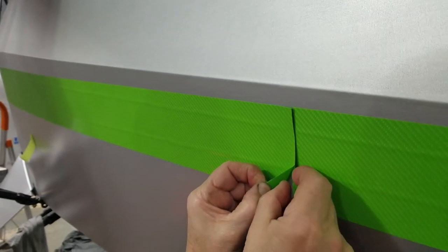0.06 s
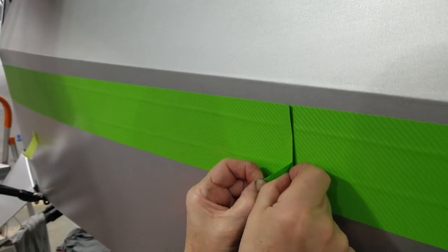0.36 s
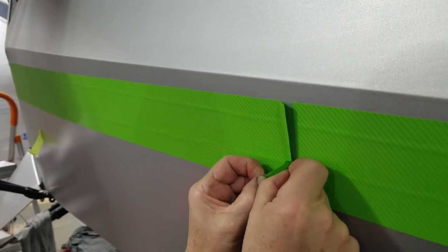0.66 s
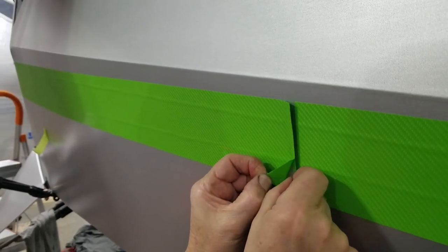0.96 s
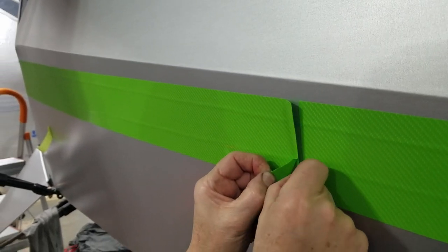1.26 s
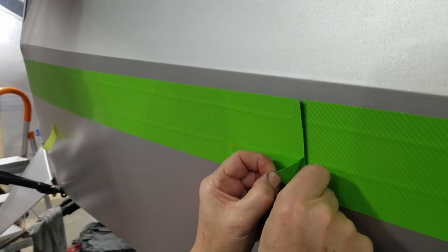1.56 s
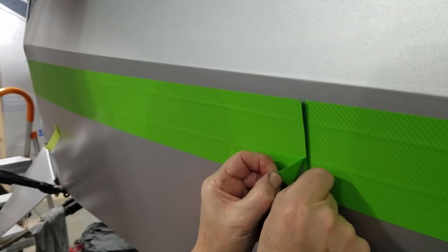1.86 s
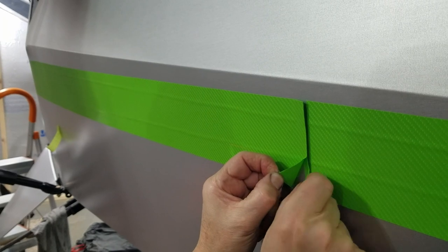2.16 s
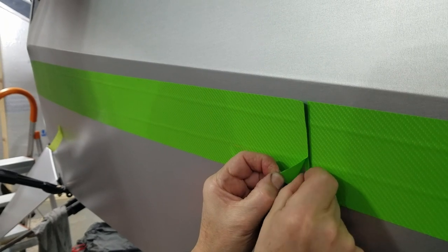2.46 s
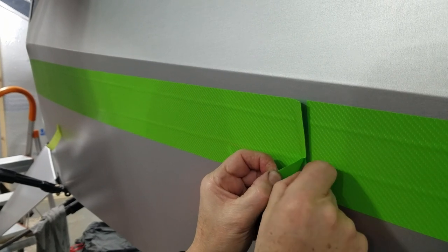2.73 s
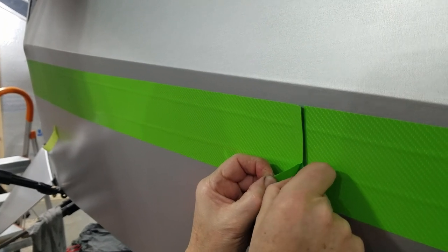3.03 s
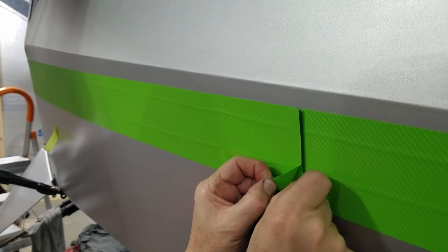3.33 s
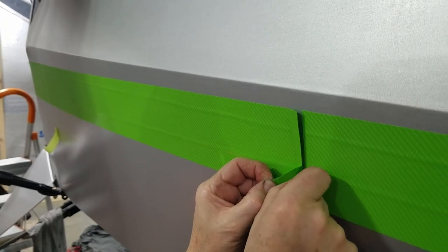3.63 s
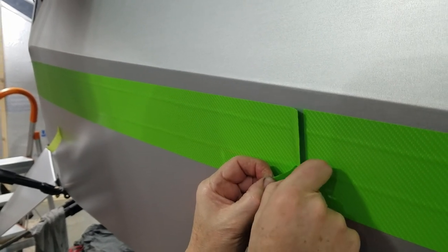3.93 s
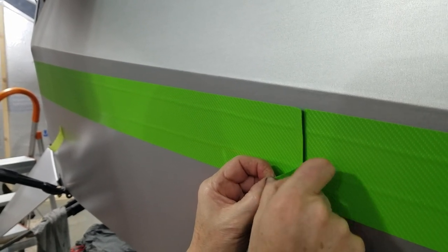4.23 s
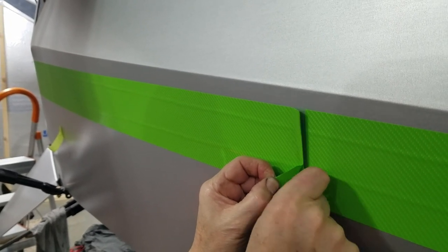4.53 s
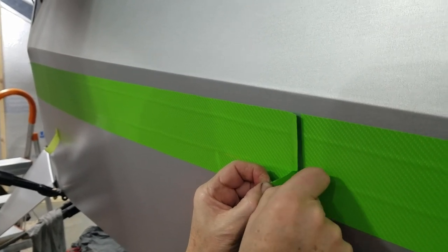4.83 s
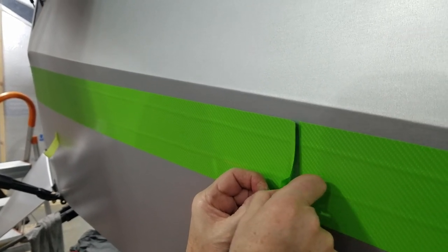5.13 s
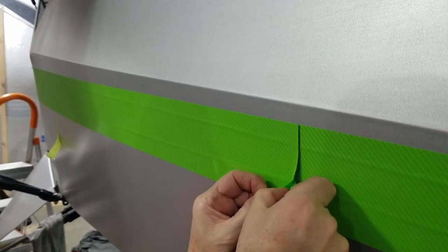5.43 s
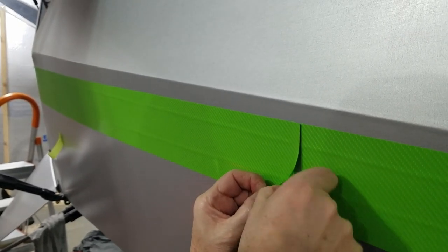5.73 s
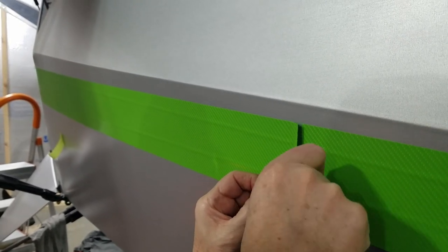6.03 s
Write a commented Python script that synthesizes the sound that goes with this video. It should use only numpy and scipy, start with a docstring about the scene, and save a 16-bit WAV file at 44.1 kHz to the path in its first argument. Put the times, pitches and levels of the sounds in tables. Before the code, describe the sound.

Fingers work a vinyl strip on taut fabric, making sharp ticks and two drum-like thumps over a faint workshop hum.

```python
"""A vinyl stripe snaps as fingers work its end on fabric stretched over a frame, in a quiet workshop.
Each snap is a tick of the stiff edge, a slap of the hand-damped fabric and a twang of the loose flap.
Four times the adhesive lets go and the whole panel booms like a drum skin.
Fingertips rub and a knuckle bumps the frame between snaps, over a steady fan-like hum."""
import sys
import numpy as np
from scipy import signal
from scipy.fft import rfft, irfft
from scipy.io import wavfile

SR = 44100
rng = np.random.default_rng(int(sys.argv[2]) if len(sys.argv) > 2 else 0)


def pcm_store(signal):
    """Save signal as 16-bit PCM."""
    levels = np.round(np.clip(np.atleast_2d(signal), -1, 1) * 32767)
    wavfile.write(sys.argv[1], SR, levels.astype(np.int16).T)


N = 272538

# vinyl snaps: (time [s], tick [dB], tick treble [dB], slap [dB], flap pitch [Hz], flap [dB])
SNAPS = [(0.5005, -20.5, 3, -38, 2220, -59), (0.531, -18.5, -3, -53, 1540, -40),
         (0.7923, -16.5, -7, -36, 570, -32), (1.4616, -23.5, -6, -43, 1260, -39),
         (1.5070, -17, -10.5, -33, 1330, -33.5), (1.5868, -25.5, 26, -54, 1260, -57),
         (1.5991, -25.5, -30, -28.5, 986, -32.5), (2.1215, -15.5, -8, -39.5, 1370, -37),
         (2.1572, -22.5, 5, -46, 616, -52), (2.8658, -16.5, 18, -18, 580, -30),
         (3.1735, -24.5, -8, -29.5, 1365, -36), (3.2360, -31, -14, -47, 2870, -42),
         (3.9396, -17, -7.5, -58, 1370, -32), (4.0154, -10, -2, -4.5, 1307, -9.5),
         (4.496, -23, -0.5, -33.5, 1660, -38.5), (5.0338, -38, -2, -36, 3040, -37),
         (5.0479, -10, -34, -20.5, 584, -27.5), (5.0999, -8, -11, -0.5, 942, -10),
         (5.2908, -22.5, -7, -38, 1540, -49)]
def snaps(tick_pan_db=-0.5, slap_pan_db=-3):
    """Each snap drives edge, fabric and flap; returns the ticks apart from the other two."""
    t = np.arange(SR // 8) / SR
    ticks, slaps = np.zeros((2, 2, N))
    fabric = slap(t)
    for time_s, tick_db, treble_db, slap_db, flap_hz, flap_db in SNAPS:
        add(ticks, time_s, amp(tick_db) * tick(t, slap_db, treble_db) * pan(tick_pan_db))
        body = amp(slap_db) * fabric + amp(flap_db) * flap(t, flap_hz)
        add(slaps, time_s, body * pan(slap_pan_db))
    return ticks, slaps


# vinyl edge spectrum: (frequency [Hz], relative level [dB])
TICK_SPECTRUM = [(300, 11.5), (1500, -4.5), (2600, 2.5), (4500, 0), (6500, -5), (9000, -0.5), (11500, 3),
                 (13500, 5.5), (16500, -1.5)]
def tick(t, slap_db, treble_db, crackle_gain=0.79, crackle_s=0.0011):
    """The vinyl edge flicks: one bright click and a millisecond of crackle."""
    click = stereo_noise(len(t), 0) * crackle_gain * np.exp(-t / crackle_s)
    click[0, 2] = click[1, 0] = 1
    click /= np.sqrt(np.sum(click ** 2) / 2)
    # a big release takes longer, which rounds off the click
    rolloff = [(11000, 0), (15000, np.interp(slap_db, [-35, -10], [0, -9]))]
    shelf = [(3500, 0), (12000, treble_db)]
    return colour(click, [(hz, db + lookup(rolloff, hz) + lookup(shelf, hz)) for hz, db in TICK_SPECTRUM])


# modes of the fabric under the fingers: (frequency [Hz], relative level [dB], t60 [s])
PATCH_MODES = [(240, -16, .03), (610, -13, .02), (885, -13, .035), (1080, -18, .03), (1250, -20, .03),
               (1540, -20, .025), (1890, -23, .02), (2200, -26, .014)]
def slap(t, pulse_s=0.00036, pulse_rise_s=0.00028, pulse_gain=6, patch_rise_s=0.00056):
    """The released fabric jumps: a rounded pressure pulse, then the patch rings."""
    pulse = pulse_gain * (1 - t / pulse_s / 3) * np.exp(-t / pulse_s) * rise(t, pulse_rise_s) ** 3
    patch = ring(PATCH_MODES, t, lead_s=0.0002) * rise(t, patch_rise_s) ** 2
    return -(pulse + patch * pan(0.6))


def flap(t, hz, overtone_ratio=1.52, overtone_db=-9, t60_s=0.014, rise_s=0.00045):
    """The loose vinyl end twangs; its free length sets the pitch."""
    modes = [(hz, 0, t60_s), (hz * overtone_ratio, overtone_db, t60_s)]
    return -ring(modes, t, lead_s=0.000095) * rise(t, rise_s) ** 2 * pan(1)


# adhesive releases: (time [s], boom [dB], tear [dB], tear build [s], tear fade [s], tear treble [dB])
RELEASES = [(0.7919, -47.5, -34.5, 0.00019, 0.00097, 9), (2.8653, -36.5, -49, .004, .005, 28),
            (4.0153, -24.5, -29, 0.00039, 0.003, -1), (5.0998, -21.5, -33, 0.00037, 0.02, -0.5)]
# tearing adhesive spectrum: (frequency [Hz], relative level [dB])
PEEL_SPECTRUM = [(300, -5.5), (950, -2), (1500, 6.5), (2400, 0), (4500, -5.5), (6000, -10.5), (9000, -22.5)]
def peel():
    """Adhesive threads break in a crackle that builds to each release and quickly fades."""
    t = np.arange(-SR // 50, SR // 8) / SR
    out = np.zeros((2, N))
    for time_s, _, tear_db, build_s, fade_s, treble_db in RELEASES:
        threads = unit(grains(len(t), correlation=0.2, spread_db=5))
        envelope = np.exp(-abs(t) / np.where(t < 0, build_s, fade_s))
        shelf = [(1500, 0), (8000, treble_db)]
        spectrum = [(hz, db + lookup(shelf, hz)) for hz, db in PEEL_SPECTRUM]
        add(out, time_s + t[0], amp(tear_db) * colour(threads * envelope, spectrum))
    return out * pan(-2)


def booms(panel, early_db=4, settle_s=0.042):
    """Each release rings the whole panel; the first wide swings lose energy fastest."""
    t = np.arange(panel.shape[1]) / SR
    out = np.zeros((2, N))
    swing = panel * amp(early_db * np.exp(-t / settle_s))
    for time_s, boom_db, *_ in RELEASES:
        add(out, time_s, amp(boom_db) * swing)
    return out


# strong panel modes: (frequency [Hz], level before step_gain [dB], t60 [s])
PANEL_MODES = [(45, -19, 1.91), (68, -23, 1.51), (92, -16, 1.86), (106, -19, 1.8), (117, -18, 1.57),
               (142, -12, 1.64), (155, -17, 1.17), (173, -3, 1.01), (188, -16, 1.07), (201, -14, 1.09),
               (221, -1, 0.34), (241, -17, 1.32), (252, -11, 1.32), (264, -17, 1.07), (280, -8, 0.7),
               (301, -5, 0.64), (316, -18, 1.1), (329, -19, 1.03), (342, -22, 1.21), (358, -20, 1.05),
               (393, -20, 0.6), (425, -18, 0.79), (454, -20, 0.8), (470, -14, 0.54), (531, -17, 0.43),
               (556, -24, 0.5), (594, -23, 0.52), (622, -23, 0.45)]
# spectrum of the dense weak modes: (frequency [Hz], relative level [dB])
DENSE_SPECTRUM = [(25, -24.5), (50, -14), (100, -12), (180, -13), (320, -21), (450, -17.5), (750, -23.5),
                  (1500, -65)]
# their decay: (frequency [Hz], t60 [s])
DENSE_T60 = [(50, 1.5), (120, 3.86), (250, 4.1), (450, 1.2), (900, 1.5)]
def panel_response(t, dense_db=-17, rise_s=0.02, bloom_s=0.008):
    """Neighbouring modes swing in opposite senses; weaker ones fill in as the wave crosses the panel."""
    strong = ring(PANEL_MODES, t, lead_s=0.00037, step_gain=-1.0228) * rise(t, rise_s) * pan(-3)
    noise = colour(stereo_noise(len(t), 0.6), DENSE_SPECTRUM)
    dense = decay(noise, DENSE_T60) * rise(t, bloom_s)
    return strong + amp(dense_db) * dense


# fingertip strokes: (time [s], length [s], rub [dB], rasp [dB])
STROKES = [(1.472, 0.14, -53.5, -64.5), (2.35, 0.095, -48.5, -80), (2.432, 0.14, -55.5, -77),
           (3.119, 0.091, -50, -72), (3.199, 0.15, -54, -73), (4.272, 0.067, -51, -63),
           (4.961, 0.055, -52, -57), (5.02, 0.034, -62, -65), (5.65, 0.052, -52.5, -64.5),
           (6.041, 0.23, -53, -67.5)]
# low rub and dry rasp spectra: (frequency [Hz], relative level [dB])
RUB_SPECTRUM = [(40, 0.5), (150, 4.5), (500, 3), (900, -7), (1300, -5.5), (2500, -13.5), (6000, -41.5)]
RASP_SPECTRUM = [(300, -12), (1500, 12.5), (3000, 10.5), (6000, 2), (11000, -4), (16000, -4)]
def rubs():
    """Fingertips drag over the weave in tiny uneven slips."""
    out = np.zeros((2, N))
    for time_s, length_s, rub_db, rasp_db in STROKES:
        slips = grains(SR // 2, correlation=0.91, spread_db=5.5)
        rub = amp(rub_db) * unit(colour(slips, RUB_SPECTRUM))
        rasp = amp(rasp_db) * unit(colour(slips, RASP_SPECTRUM))
        envelope = np.sin(np.linspace(0, np.pi, int(length_s * SR)))
        add(out, time_s, (rub + rasp)[:, :len(envelope)] * envelope)
    return out * pan(-1.4)


# knuckle bumps: (time [s], thud [dB], ring [dB])
BUMPS = [(2.3381, -42, -33.5), (2.3505, -43, -42), (2.38, -43, -63), (2.394, -29.5, -34)]
# frame modes: (frequency [Hz], relative level [dB], t60 [s])
FRAME_MODES = [(450, -4, .05), (1170, -2, .04), (1290, -6, .04), (1900, -14, .04)]
def bumps(thud_hz=145, thud_s=0.0033, rise_s=0.00083):
    """A knuckle meets the frame while the hand damps the fabric."""
    t = np.arange(SR // 5) / SR
    out = np.zeros((2, N))
    thud = np.sin(2 * np.pi * thud_hz * t) * t / thud_s * np.exp(1 - t / thud_s)
    hollow = ring(FRAME_MODES, t, lead_s=0.00027) * rise(t, rise_s)
    for time_s, thud_db, ring_db in BUMPS:
        add(out, time_s, amp(thud_db) * thud + amp(ring_db) * hollow)
    return out * pan(-3.1)


# rumble and hiss: (frequency [Hz], relative level [dB])
HUM_SPECTRUM = [(22, -14), (42, -0.5), (95, 0.5), (170, -2.5), (260, -9.5), (550, -10.5), (800, -14.5),
                (1100, -22.5), (1900, -22), (3600, -37.5), (6500, -39), (9000, -40), (12000, -33.5),
                (15500, -30)]
# fan resonances: (frequency [Hz], width [Hz], lift [dB])
FAN_PEAKS = [(594, 3.9, 11.5), (1469, 118, 13), (2997, 470, 10.5), (4386, 730, 9.5), (5740, 250, 6)]
# hum width: (frequency [Hz], left-right correlation [-])
HUM_CORRELATION = [(60, 1), (130, 0.9), (290, 0.98), (640, 0.56), (1410, -0.019), (3100, 0.069),
                   (6820, -0.12), (15000, -0.12)]
# hum balance: (frequency [Hz], left minus right [dB])
HUM_PAN = [(60, -2.5), (130, -1.5), (290, -1.5), (640, -1.5), (1410, -3), (3100, 0), (6820, 2.0),
           (15000, 3)]
def workshop_hum(rms_db=-51, cutoff_hz=15900):
    """Steady rumble and hiss with the narrow whine of a fan."""
    hz = np.fft.rfftfreq(N, 1 / SR)
    left, spare = rfft(rng.standard_normal((2, N)))
    correlation, pan_db = lookup(HUM_CORRELATION, hz), lookup(HUM_PAN, hz)
    right = correlation * left + np.sqrt(1 - correlation ** 2) * spare
    noise = np.array([left * amp(pan_db / 2), right * amp(-pan_db / 2)])
    whine_db = sum(db / (1 + (2 * (hz - peak_hz) / width_hz) ** 2) for peak_hz, width_hz, db in FAN_PEAKS)
    gain = amp(lookup(HUM_SPECTRUM, hz) + whine_db) * (hz < cutoff_hz)
    return amp(rms_db) * unit(irfft(noise * gain, N))


# room decay: (frequency [Hz], t60 [s])
ROOM_T60 = [(200, 0.91), (1000, 0.34), (3000, 0.46), (8000, 0.51), (16000, 0.22)]
# near reflections: (delay [s], gain [-])
ECHOES = [(.0032, 0.18), (.0062, 0.17), (0.0153, 0.14), (0.0161, 0.12), (.0302, 0.033)]
def room(x, tail_db=-11, build_s=0.00055, treble_db=-4):
    """Near reflections and a short diffuse tail with reduced treble."""
    t = np.arange(SR) / SR
    diffuse = colour(stereo_noise(SR, 0.18), [(4000, 0), (12000, treble_db)])
    response = decay(diffuse, ROOM_T60) * rise(t, build_s)
    response *= amp(tail_db) / np.linalg.norm(response[0])
    for delay_s, gain in ECHOES:
        response[[0, 1], round(delay_s * SR) + rng.integers(0, 20, 2)] += gain
    return signal.fftconvolve(x, response, axes=1)[:, :N]


def amp(db):
    """Decibels to gain."""
    return 10 ** (np.asarray(db) / 20)


def unit(x):
    """Scale to rms 1."""
    return x / np.sqrt(np.mean(x ** 2) + 1e-20)


def lookup(points, hz):
    """Interpolate over log frequency."""
    points_hz, values = np.transpose(points)
    return np.interp(np.log(hz + 1), np.log(points_hz + 1), values)


def add(mix, time_s, sound):
    """Mix in a stereo sound at time_s."""
    part = mix[:, round(time_s * SR):][:, :sound.shape[-1]]
    part += sound[..., :part.shape[1]]


def pan(db):
    """Stereo gains for a left-minus-right level."""
    return amp(np.array([[db], [-db]]) / 2)


def rise(t, tau_s):
    """Exponential attack from 0 to 1."""
    return 1 - np.exp(-t / tau_s)


def stereo_noise(size, correlation):
    """White noise with a given left-right correlation."""
    left, spare = rng.standard_normal((2, size))
    return np.array([left, correlation * left + np.sqrt(1 - correlation ** 2) * spare])


def grains(size, correlation, spread_db):
    """Gritty noise: a random boost on every sample."""
    return stereo_noise(size, correlation) * amp(spread_db * np.minimum(rng.exponential(1, size), 5))


def colour(x, spectrum):
    """Minimum-phase filter of unit energy."""
    hz = abs(np.fft.fftfreq(4096, 1 / SR))
    log_gain = np.log(amp(lookup(spectrum, hz)))
    taps = np.fft.ifft(np.exp(np.conj(signal.hilbert(log_gain)))).real[:2048]
    return signal.fftconvolve(x, taps[None] / np.linalg.norm(taps), axes=1)[:, :x.shape[1]]


def decay(x, t60_curve):
    """Fade each band at its own rate."""
    hz, t, bands = signal.stft(x, SR, nperseg=512)
    fade = amp(-60 * t / lookup(t60_curve, hz)[:, None])
    return signal.istft(bands * fade, SR)[1][:, :x.shape[1]]


def ring(modes, t, lead_s, step_gain=1):
    """Damped modes, the k-th scaled by step_gain ** k; the right channel leads by lead_s."""
    t = np.maximum(t - np.array([[lead_s], [0]]), 0)
    return (t > 0) * sum(step_gain ** k * amp(db - 60 * t / t60_s) * np.cos(2 * np.pi * hz * t)
                         for k, (hz, db, t60_s) in enumerate(modes))


def scene(sway_db=-17, tick_send_db=-4):
    """Vinyl, fabric and hands close by, the workshop around them."""
    panel = panel_response(np.arange(2 * SR) / SR)
    strokes = rubs()
    # rubbing stirs the panel too
    sway = signal.fftconvolve(strokes, panel / np.linalg.norm(panel[1]), axes=1)[:, :N]
    ticks, slaps = snaps()
    near = slaps + peel() + bumps() + strokes
    reverb = room(near + amp(tick_send_db) * ticks)  # ticks face the microphone and stay drier
    return ticks + near + reverb + booms(panel) + amp(sway_db) * sway + workshop_hum()


def record(dry, low_cut_hz=30, high_cut_hz=16400):
    """Microphone low cut and band limit."""
    highpass = signal.butter(2, low_cut_hz, "highpass", fs=SR, output="sos")
    lowpass = signal.firwin(401, high_cut_hz, window=("kaiser", 9), fs=SR)
    return signal.oaconvolve(signal.sosfilt(highpass, dry), lowpass[None], "same")


dry = scene()
out = record(dry)
pcm_store(out)
```